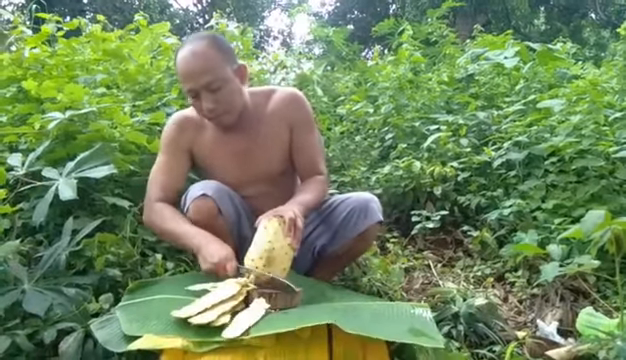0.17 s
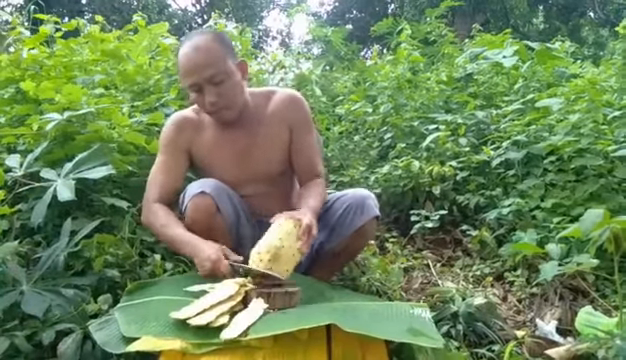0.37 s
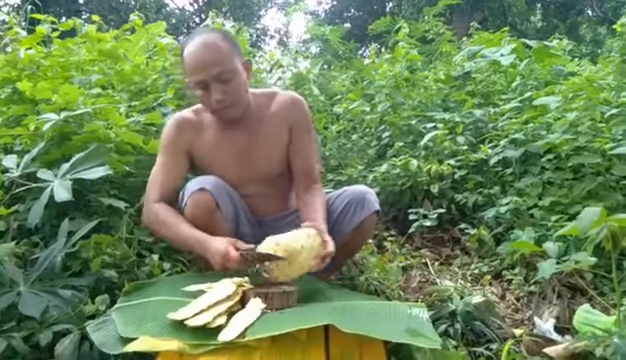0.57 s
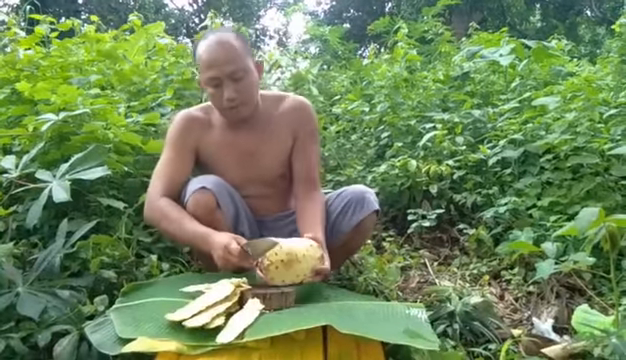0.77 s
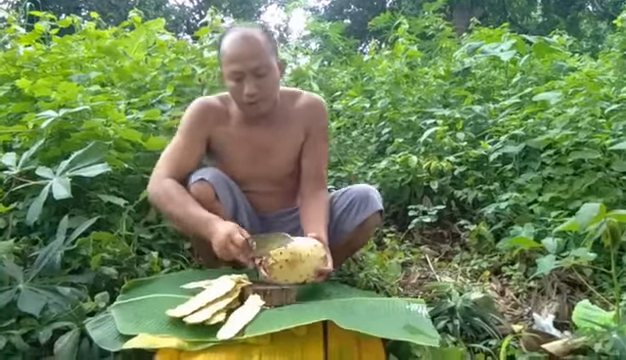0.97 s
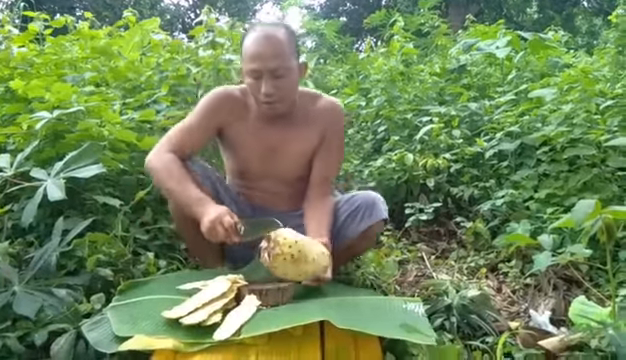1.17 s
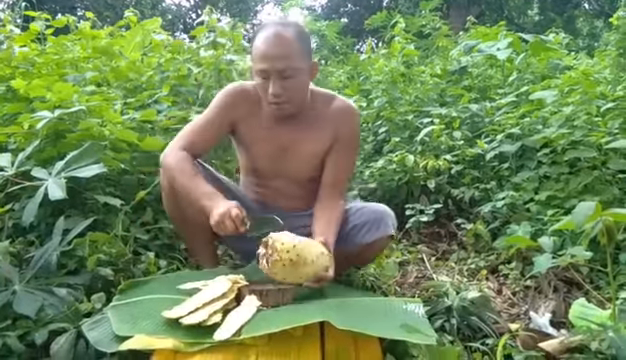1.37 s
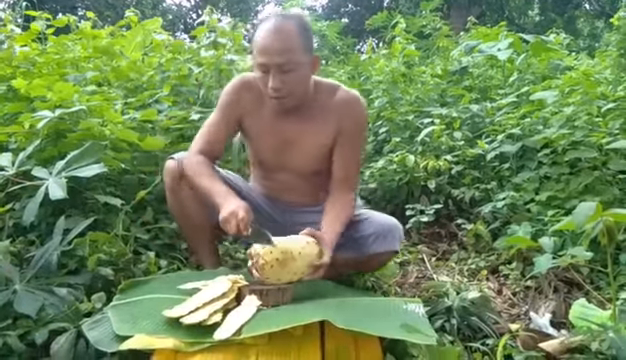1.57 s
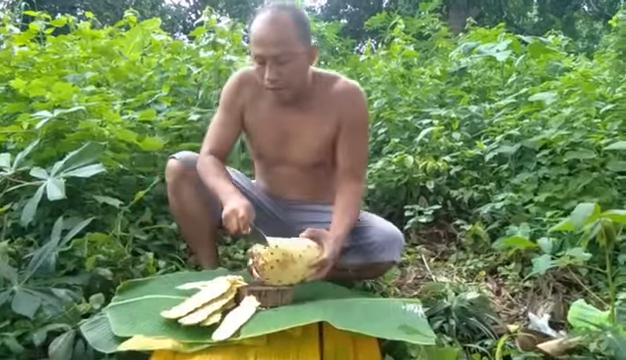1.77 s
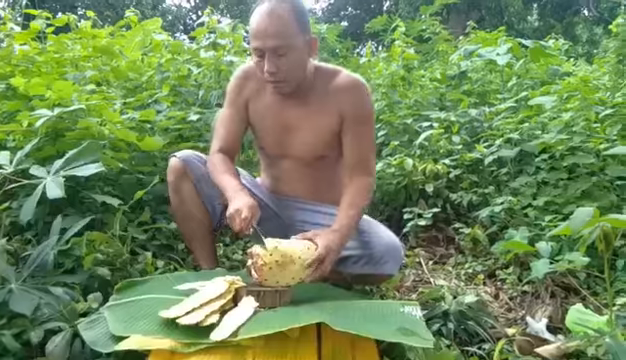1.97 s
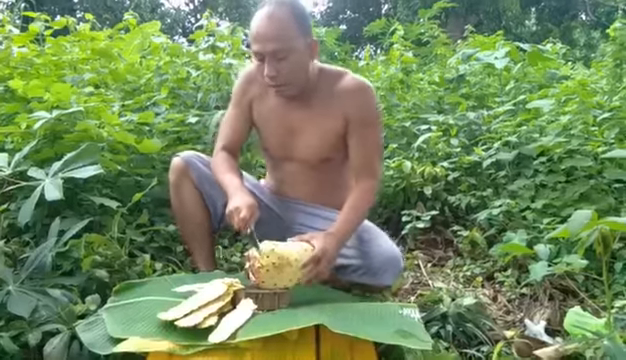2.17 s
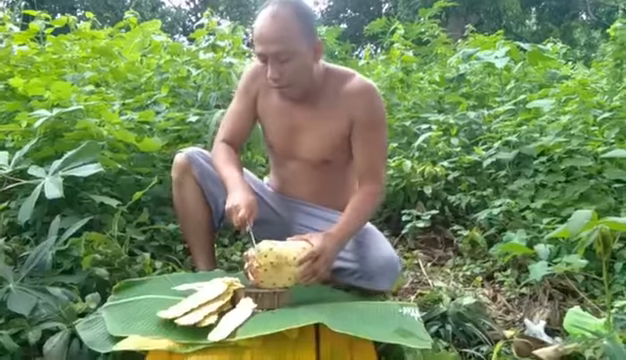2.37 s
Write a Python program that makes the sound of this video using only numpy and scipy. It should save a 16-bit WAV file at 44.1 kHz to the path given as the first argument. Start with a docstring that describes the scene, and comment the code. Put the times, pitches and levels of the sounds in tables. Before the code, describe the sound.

Knife crunching through pineapple rind onto wood, then small wet ticks, with faint birds outdoors.

```python
"""A small bird's high falling chip and far whistles sound over a low rumble and a faint hiss of insects.
At the edge of a thicket, close to one microphone, a large knife slices the rind off a pineapple:
fibres snap as the blade crunches through, then it knocks on the wooden block and sets it ringing.
The fruit is turned over with a rub, soft knocks and small wet ticks, then the blade bites again.
Leaves and stems scatter short echoes of the knife and the birds."""
import sys
import numpy as np
from scipy import signal
from scipy.fft import rfft, irfft
from scipy.io import wavfile
from scipy.ndimage import uniform_filter1d

SR = 44100
rng = np.random.default_rng(int(sys.argv[2]) if len(sys.argv) > 2 else 0)


def wrap_up_sound(samples):
    """Save the sound to the file named by the first command line argument, as 16-bit audio."""
    columns = np.atleast_2d(samples).T
    # keep every value between -1 and 1, then stretch to whole-number steps
    tamed = np.clip(columns, -1, 1)
    steps = np.round(tamed * 32767).astype(np.int16)
    wavfile.write(sys.argv[1], SR, steps)


N = 110250
T = np.arange(N) / SR


def from_db(db):
    """Decibels to gain."""
    return 10 ** (np.asarray(db) / 20)


def unit_rms(x):
    """Scale to unit rms."""
    return x / np.sqrt(np.mean(x ** 2) + 1e-20)


def level(rows):
    """Gain along a (time_s, level_db) curve, silent outside it."""
    time_s, db = np.transpose(rows)
    return from_db(np.interp(T, time_s, db)) * (T >= time_s[0]) * (T <= time_s[-1])


def coloured(x, spectrum):
    """Give a signal a (frequency_hz, gain_db) spectrum, at unit rms."""
    hz, db = np.transpose(spectrum)
    log_hz = np.log(np.fft.rfftfreq(N, 1 / SR) + 1)
    gain = from_db(np.interp(log_hz, np.log(hz), db))
    return unit_rms(irfft(rfft(x) * gain, N))


def dying(start_s, t60):
    """Envelope that jumps up at start_s and dies away."""
    return (T >= start_s) * from_db(-60 * np.clip((T - start_s) / t60, 0, 2))


def wander(count, window):
    """Noise smoothed over a window of samples, at unit rms."""
    return unit_rms(uniform_filter1d(rng.standard_normal(count), size=window))


def ring(x, hz, t60):
    """One mode: a unit click sets a sine of height 1 ringing."""
    decay, step = from_db(-60 / (t60 * SR)), 2 * np.pi * hz / SR
    return signal.lfilter([0, np.sin(step)], [1, -2 * decay * np.cos(step), decay * decay], x + 1e-18)


def resonate(x, table):
    """Pass a signal through parallel (pitch_hz, width_hz, gain_db) resonances."""
    return sum(from_db(db) * signal.lfilter(*signal.iirpeak(hz, hz / width, fs=SR), x + 1e-18)
               for hz, width, db in table)


def thicket(x, t60, delay_s=0.0025):
    """Dense dying echoes reach the microphone from leaves and stems."""
    echoes = rng.standard_normal(N) * dying(delay_s, t60)
    return signal.fftconvolve(x, echoes[:SR] / np.sqrt(np.sum(echoes ** 2)))[:len(x)]


def fibres(snaps_per_s=1800, spread_db=3):
    """Dense random snaps of uneven size."""
    sizes = from_db(spread_db * np.minimum(rng.exponential(1, N), 4)) * rng.choice([-1, 1], N)
    return sizes * (rng.random(N) < snaps_per_s / SR)


# Calls of the bird nearest the microphone: start_s, level_db, starting_pitch_hz
CHIPS = [(-.016, -43.5, 8720), (0.228, -44, 8590), (.664, -42.5, 8820), (.959, -47, 8870),
         (1.409, -47, 8760), (1.924, -49, 8860)]
# Loudness through one chip: share_of_chip, gain_db
CHIP_SHAPE = [(0, -17), (.2, -10), (.55, -4.5), (.7, -0.5), (.85, 4), (.94, -7), (1, -3)]


def near_bird(length_s=0.029, rise_hz=1502, fall_hz=5494, bend=2.7, echo_db=2.5):
    """Each trembling chip arches up a little, then plunges; the thicket smears it into a tail."""
    t = np.arange(-SR // 10, N) / SR   # the first chip is already under way at zero
    calls = np.zeros(len(t))
    flutter_db = uniform_filter1d(3.5 * wander(len(t), window=90), size=60)
    waver_hz = uniform_filter1d(95 * wander(len(t), window=120), size=80)
    for start_s, db, hz in CHIPS:
        progress = np.clip((t - start_s) / length_s, 0, 1)
        shape_db = np.interp(progress, *np.transpose(CHIP_SHAPE))
        envelope = from_db(db + flutter_db + shape_db) * np.minimum(1, 20 * progress * (1 - progress))
        pitch_hz = hz + waver_hz + rise_hz * progress - fall_hz * progress ** bend
        calls += envelope * np.sin(2 * np.pi * np.cumsum(pitch_hz) / SR)
    return (calls + from_db(echo_db) * thicket(calls, t60=0.41))[-N:]


# Spectra of the distant rumble and of the leaves and insects around: frequency_hz, gain_db
RUMBLE_COLOUR = [(20, -33), (40, -20.5), (60, -9), (85, -2.5), (112, -0.5), (150, -3.5), (200, -12.5),
                 (260, -10.5), (350, -19), (500, -26), (900, -39), (3000, -57), (10000, -88)]
LEAF_COLOUR = [(100, -2.5), (500, 0.5), (800, 2), (1300, -1), (2200, -3.5), (3200, -5), (5000, -3.5),
               (6500, -6.5), (7200, -5.5), (8000, -17.5), (9600, -23), (11000, -25.5), (12500, -29.5),
               (15500, -26)]
INSECT_COLOUR = [(4000, -43), (5500, -8.5), (6200, -0.5), (7100, -5.5), (7800, -20), (10000, -50)]
# Leaves and insects at the microphone: time_s, level_db
LEAF_LEVEL = [(0, -56.5), (.5, -56.5), (1.4, -56.5), (2.1, -58), (2.5, -56.5)]
INSECT_LEVEL = [(0, -65), (.5, -66.5), (.9, -66.5), (1.2, -66.5), (1.38, -59.5), (1.6, -60.5),
                (1.85, -59.5), (2.1, -73.5), (2.5, -64.5)]


def background(rumble_db=-47):
    """Distant low rumble, the hiss of leaves, and a thin band of insects that swells and recedes."""
    rumble = from_db(rumble_db) * coloured(rng.standard_normal(N), RUMBLE_COLOUR)
    leaves = level(LEAF_LEVEL) * coloured(rng.standard_normal(N), LEAF_COLOUR)
    insects = level(INSECT_LEVEL) * coloured(rng.standard_normal(N), INSECT_COLOUR)
    return rumble + leaves + insects


# Force of the blade in the rind, close by: time_s, level_db
FIRST_CUT = [(0, -59), (.078, -67), (.09, -48), (.098, -45.5), (.106, -45.5), (.116, -55.5), (.128, -55),
             (.133, -43.5), (.144, -53.5), (.16, -55.5), (.187, -53.5), (.191, -40), (.197, -47),
             (.204, -45), (.213, -43), (.218, -51), (.24, -49), (.3, -81)]
SECOND_CUT = [(2.352, -59), (2.36, -59), (2.395, -62), (2.43, -69), (2.5, -78)]
# Forward slips of the blade: start_s, length_s, level_db
SLIPS = [(0.1, 0.01, -57), (0.1308, 0.007, -38.5), (0.1856, 0.0044, -39), (0.208, 0.0064, -35)]
# Spectra of the crunch and of the crisp snaps in rasps and ticks: frequency_hz, gain_db
CRUNCH_COLOUR = [(200, -23), (600, -9), (1600, -4.5), (2800, -4), (3900, -3), (6200, 2.5), (7300, 4.5),
                 (8300, -16), (10500, -17.5), (12500, -28), (15500, -25)]
CRISP_COLOUR = [(300, -2), (1500, -8), (3000, -11.5), (4300, -5.5), (6500, 0), (7400, -4), (8400, -19),
                (10000, -37), (15500, -43)]
# Resonances of the blade in the rind and of its rasp: pitch_hz, width_hz, gain_db
BLADE_BANDS = [(595, 99, 5.5), (1600, 160, -2.5), (2370, 140, -9), (2900, 140, -7), (3700, 190, -1.5),
               (4620, 200, -1), (5690, 150, 4.5), (6170, 150, -4), (6700, 190, -7)]
RASP_BANDS = [(3700, 250, -6), (4730, 220, 6), (5650, 320, 4), (6170, 300, -3), (6960, 370, -12)]


def rind(blade_db=-2.5):
    """Fibres snap under the blade and set it ringing; it rasps as it slips forward."""
    rasp = unit_rms(resonate(coloured(fibres(), CRISP_COLOUR), RASP_BANDS))
    slips = np.zeros(N)
    for start_s, length_s, db in SLIPS:
        progress = np.clip((T - start_s) / length_s, 0, 1)
        slips += from_db(db) * np.sqrt(np.abs(np.sin(np.pi * progress)))
    force = level(FIRST_CUT) + level(SECOND_CUT)
    snaps = fibres()
    blade = from_db(blade_db) * unit_rms(resonate(force * snaps, BLADE_BANDS))
    blade *= np.sqrt(np.mean(force ** 2))
    return force * coloured(snaps, CRUNCH_COLOUR) + blade + slips * rasp


# Birds far off in the thicket: start_s, length_s, level_db, pitch_hz, glide_hz
WHISTLES = [(0.007, 0.022, -45.5, 2986, -62), (0.054, 0.027, -62, 2950, 60),
            (0.165, 0.0347, -41, 3715, 237), (1.851, 0.101, -53, 3880, 41), (1.975, 0.105, -63.5, 3896, 22),
            (2.148, 0.065, -65, 5066, 30), (1.867, 0.38, -56.5, 723.2, -8.5), (2.33, 0.011, -54, 4900, 248),
            (2.361, 0.049, -50.5, 4405, -450), (2.40, 0.035, -51, 4740, 200),
            (2.443, 0.0315, -53, 4130, 502), (2.467, 0.035, -53, 4730, 200)]


def far_birds(warble_share=0.013, direct_db=-9):
    """Thin wavering whistles, heard mostly through their echoes."""
    calls = np.zeros(N)
    warble = 1 + warble_share * wander(N, window=200)
    for start_s, length_s, db, hz, glide_hz in WHISTLES:
        progress = np.clip((T - start_s) / length_s, 0, 1)
        envelope = from_db(db) * np.sqrt(np.abs(np.sin(np.pi * progress)))
        pitch_hz = (hz + glide_hz * progress) * warble
        calls += envelope * np.sin(2 * np.pi * np.cumsum(pitch_hz) / SR)
    return from_db(direct_db) * calls + thicket(calls, t60=0.3)


# The blade meets the block, close to the microphone: start_s, level_db, brightness_hz
BLOWS = [(0.2229, -8.5, 4240), (0.223, -17.5, 6160), (0.2253, -17.5, 5460)]
# Ring of block and blade, and thump of fruit and block: pitch_hz, level_db, t60_s
BLOCK_MODES = [(870, -6.5, 0.0078), (1330, -2, 0.008), (1576, -1, 0.012), (1770, -7.5, 0.009),
               (2220, -11.5, 0.017), (2560, -18.5, 0.01), (2864, -10, 0.022), (3300, -27, 0.005),
               (3700, -11, 0.0099), (3960, -13, 0.022), (4400, -15, 0.012), (5200, -10, 0.016),
               (6210, -7, 0.0086)]
THUMP_MODES = [(112.4, -29, 0.18), (182, -24, 0.054), (251, -24, .04), (318, -22, 0.032), (408, -20, 0.025),
               (523, -28.5, 0.082), (696, -30, 0.03)]
# Spectrum of the crack at first contact: frequency_hz, gain_db
CRACK_COLOUR = [(150, 7), (600, -24), (1400, 7.5), (2800, 0.5), (4500, -5), (6800, -24), (8500, -20),
                (15000, -34)]


def chop(crack_db=-5, thud_db=-5.5, thud_hz=956, settle_s=0.2344, settle_db=-19.5, settle_hz=954):
    """A dead thud, a quick run of blade contacts that ring the block, then the block rocks back."""
    force = np.zeros(N)
    for start_s, db, hz in BLOWS:
        age = np.maximum(T - start_s, 0) * 2 * np.pi * hz
        pulse = age * np.exp(-np.minimum(age, 50))
        force += from_db(db) * pulse / pulse.sum()
    block = sum((-1) ** k * from_db(db) * ring(force, hz, t60)
                for k, (hz, db, t60) in enumerate(BLOCK_MODES))
    hit_s, hit_db, _ = BLOWS[0]
    crack = from_db(hit_db + crack_db) * dying(hit_s, t60=0.017)
    crack *= coloured(rng.standard_normal(N), CRACK_COLOUR)
    thump = -sum(from_db(db) * dying(hit_s, t60) * np.cos(2 * np.pi * hz * (T - hit_s))
                 for hz, db, t60 in THUMP_MODES)
    thump = signal.sosfilt(signal.butter(2, 1500, fs=SR, output="sos"), thump)
    spread = np.minimum((np.pi * thud_hz * (T - hit_s)) ** 2, 50)
    thud = from_db(thud_db) * (2 * spread - 1) * np.exp(-spread)   # a single pressure pulse
    age = np.clip((T - settle_s) / 0.0017, 0, 50)   # the rocking block's hollow note rises in 1.7 ms
    settle = from_db(settle_db) * age * np.exp(1 - age) * np.sin(2 * np.pi * settle_hz * (T - settle_s))
    band = signal.butter(3, [69, 6850], "band", fs=SR, output="sos")
    return signal.sosfilt(band, block + thud + thump + crack + settle)


# The steel sings on at the block: pitch_hz, level_db, t60_s
STEEL_MODES = [(3980, -33.5, 0.11), (4010, -35, 0.079), (2770, -42, 0.16)]
# Spectrum of the crushed pulp: frequency_hz, gain_db
PULP_COLOUR = [(150, -5.5), (550, 5), (1000, 2), (1300, -7), (1800, -2), (2400, -6.5), (4000, -7),
               (7000, -15), (8500, -29), (15000, -51)]


def steel_and_pulp(pulp_db=-32.5):
    """After the chop the steel sings briefly and the crushed pulp crackles out."""
    hit_s = BLOWS[0][0]
    steel = sum(from_db(db) * dying(hit_s, t60) * np.sin(2 * np.pi * hz * (T - hit_s))
                for hz, db, t60 in STEEL_MODES)
    pulp = from_db(pulp_db) * dying(hit_s, t60=0.16) * coloured(fibres(), PULP_COLOUR)
    return steel + pulp


# The fruit rubs on hand and block, close by: time_s, level_db
RUB_LEVEL = [(.85, -71), (1.0, -61), (1.07, -50), (1.15, -52.5), (1.2, -59.5), (1.33, -82), (1.5, -62),
             (1.7, -77), (2.1, -85), (2.23, -62), (2.33, -62)]
# Spectrum of the rub: frequency_hz, gain_db
RUB_COLOUR = [(150, -5), (400, 10.5), (900, -1), (1700, 6), (2800, -3.5), (4500, -2), (6800, 0),
              (8500, -22), (15000, -69)]
# Soft knocks and wet pops of the fruit: start_s, level_db, pitch_hz, t60_s
KNOCKS = [(0.318, -38, 75, 0.048), (0.518, -37, 138, 0.027), (1.154, -35, 398, 0.025),
          (1.276, -49, 394, 0.052), (1.284, -33, 112.6, 0.035), (1.366, -49, 900, 0.091),
          (1.5454, -40, 2160, 0.008), (1.592, -44.5, 1980, 0.01), (1.778, -39, 70.4, 0.058),
          (1.785, -50.5, 826, 0.18), (1.8623, -44.5, 1640, 0.0083), (2.0, -51, 1300, 0.017),
          (2.2, -54.5, 820, 0.26)]


def handling(width_share=0.36):
    """The fruit rubs, knocks and pops as it is turned."""
    out = level(RUB_LEVEL) * coloured(fibres(), RUB_COLOUR)
    edge = 1 + width_share / 2
    for start_s, db, hz, t60 in KNOCKS:
        band = signal.butter(2, [hz / edge, hz * edge], "band", fs=SR, output="sos")
        envelope = dying(start_s, t60)
        knock = signal.sosfilt(band, rng.standard_normal(N) * envelope + 1e-18)
        out += from_db(db) * unit_rms(knock) * np.sqrt(np.mean(envelope ** 2))
    return out


# Ticks of rind and blade, close to the microphone: start_s, crisp_db, wet_db
TICKS = [(0.971, -45, -55), (1.035, -37, -62), (1.145, -33, -63), (1.182, -36, -60), (1.239, -34.5, -64),
         (1.25, -39.5, -61), (1.563, -36.5, -63), (1.595, -42, -58), (1.685, -40, -67), (1.7047, -37, -57),
         (1.785, -35.5, -59), (1.82, -35.5, -63), (2.068, -41, -69), (2.1445, -42, -52), (2.251, -37, -56),
         (2.321, -46, -60), (2.3544, -26.5, -60), (2.393, -37, -69)]
# Spectrum of the very high snap of juice: frequency_hz, gain_db
WET_COLOUR = [(6000, -20), (9000, 1), (12300, -5), (14000, -8), (15500, -8)]


def ticks(rise_s=0.00045, t60=0.013):
    """Single fibres give way, some with a wet snap of juice."""
    crisp = coloured(rng.standard_normal(N), CRISP_COLOUR)
    wet = coloured(rng.standard_normal(N), WET_COLOUR)
    out = np.zeros(N)
    for start_s, crisp_db, wet_db in TICKS:
        envelope = dying(start_s, t60) * np.clip((T - start_s) / rise_s, 0, 1)
        out += envelope * (from_db(crisp_db) * crisp + from_db(wet_db) * wet) / 2
    return out


def scene():
    """Knife and fruit close to the microphone, birds and background behind."""
    blow = chop() + steel_and_pulp()
    work = rind() + ticks() + handling()
    echoes = from_db(-22.5) * thicket(blow, t60=0.24) + from_db(-12.5) * thicket(work, t60=0.41)
    return (blow + work + echoes + near_bird() + far_birds() + background())[None]


def record(dry, cutoff_hz=15600):
    """The top is cut steeply."""
    return signal.sosfilt(signal.ellip(10, .1, 70, cutoff_hz, fs=SR, output="sos"), dry)


dry = scene()
out = record(dry)
wrap_up_sound(out)
```